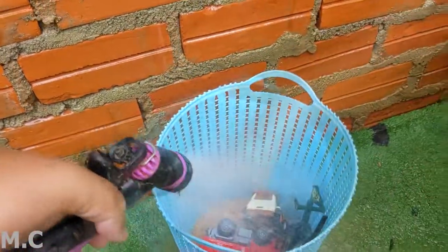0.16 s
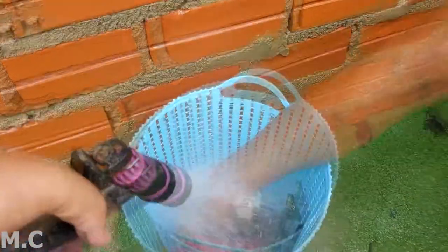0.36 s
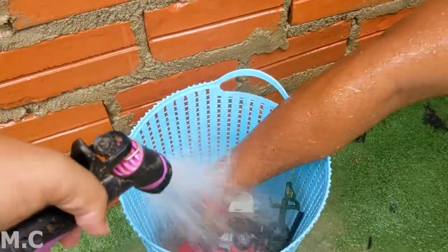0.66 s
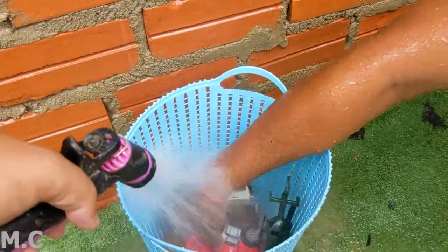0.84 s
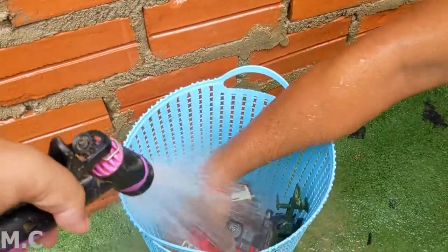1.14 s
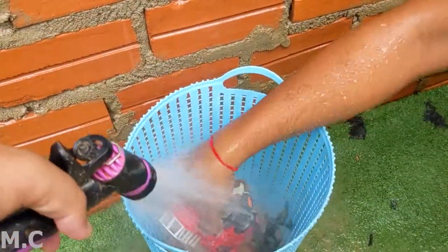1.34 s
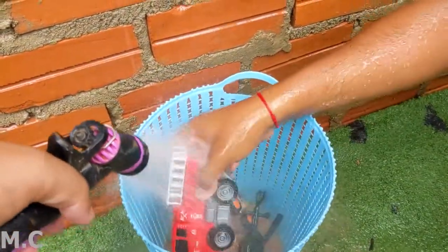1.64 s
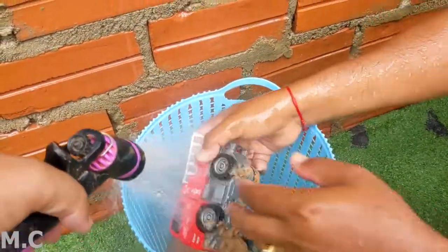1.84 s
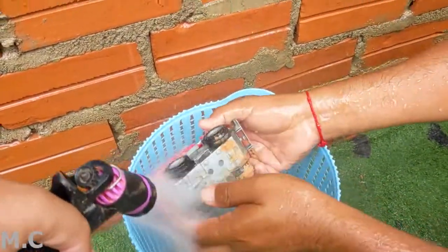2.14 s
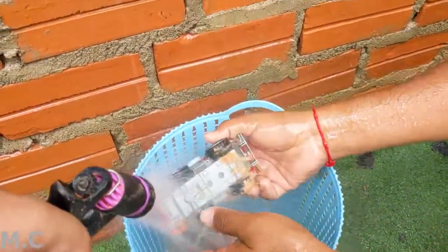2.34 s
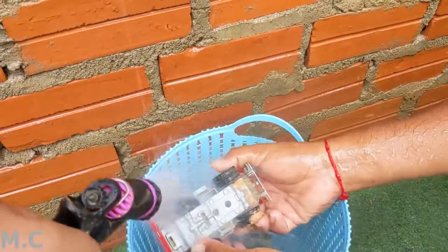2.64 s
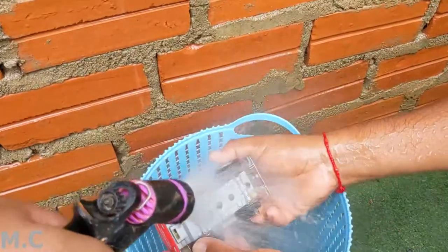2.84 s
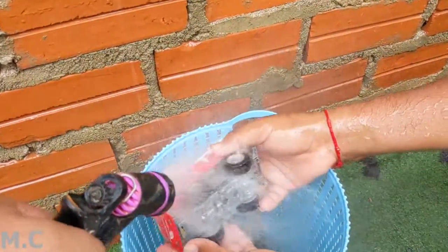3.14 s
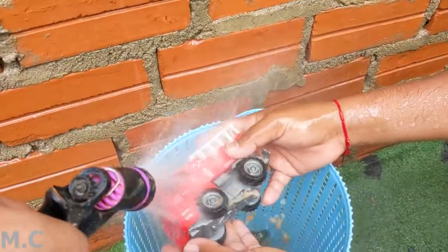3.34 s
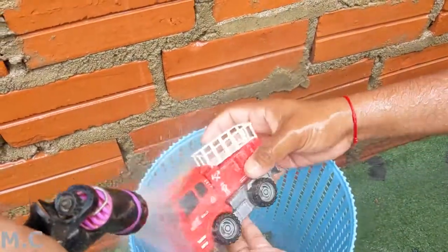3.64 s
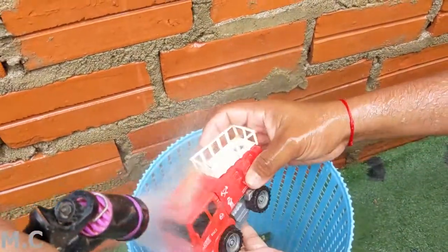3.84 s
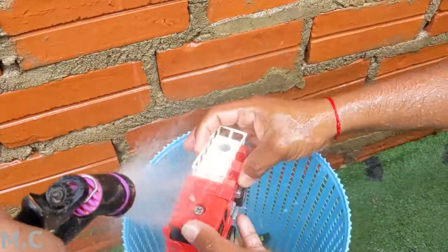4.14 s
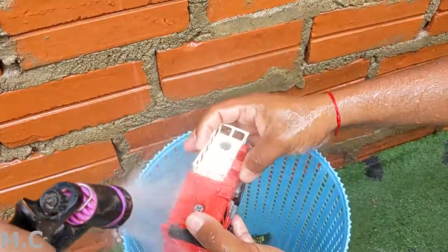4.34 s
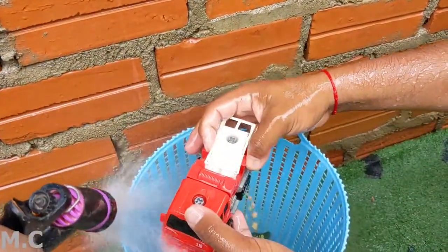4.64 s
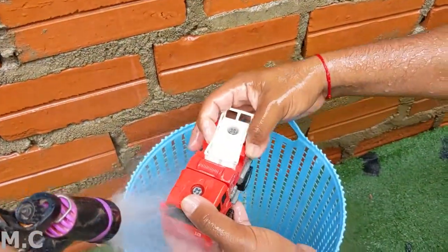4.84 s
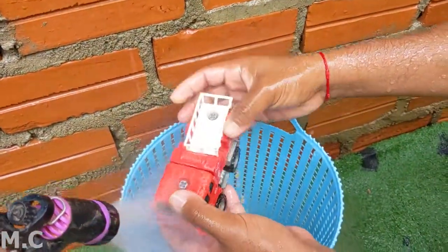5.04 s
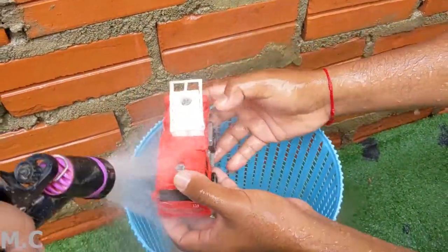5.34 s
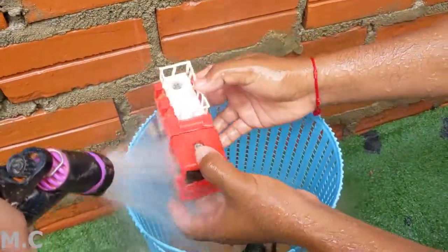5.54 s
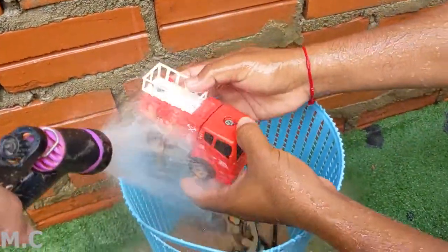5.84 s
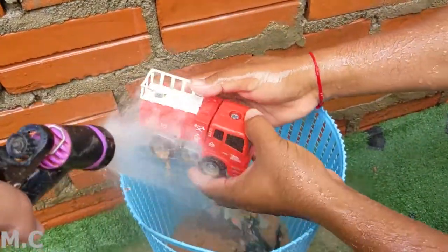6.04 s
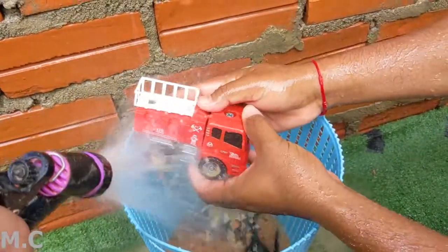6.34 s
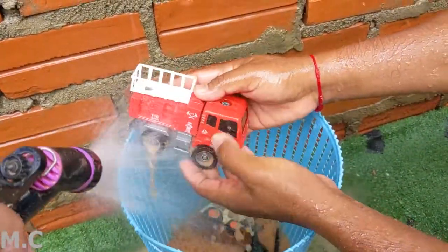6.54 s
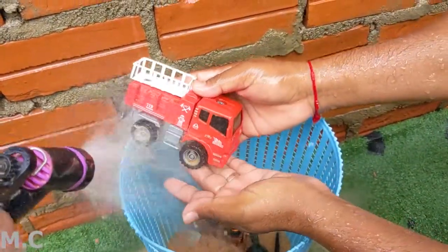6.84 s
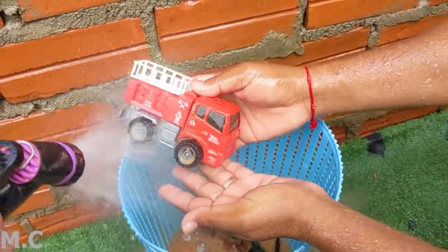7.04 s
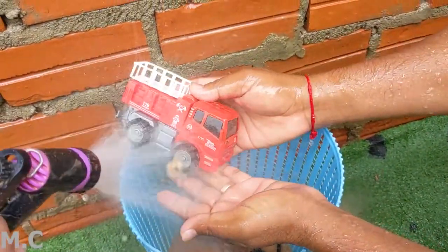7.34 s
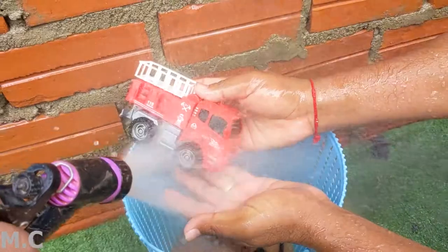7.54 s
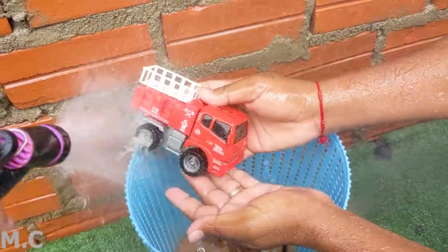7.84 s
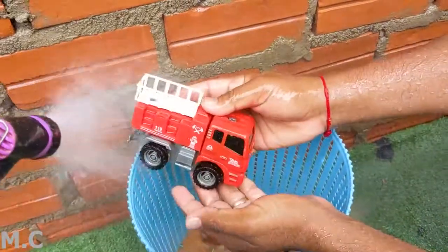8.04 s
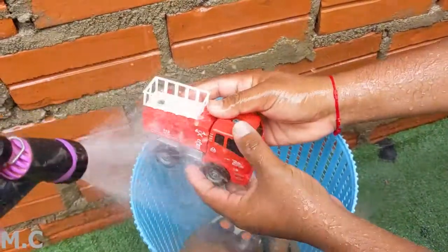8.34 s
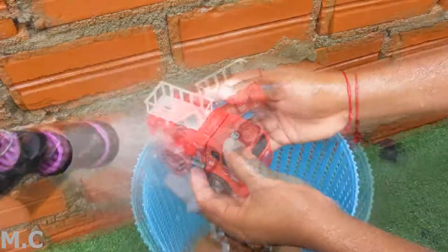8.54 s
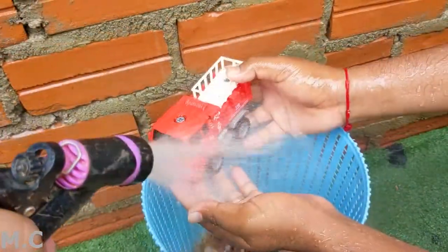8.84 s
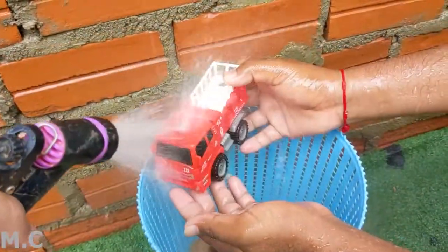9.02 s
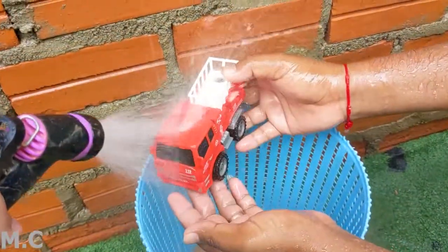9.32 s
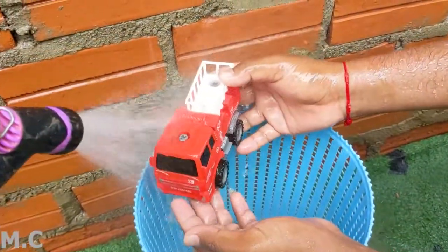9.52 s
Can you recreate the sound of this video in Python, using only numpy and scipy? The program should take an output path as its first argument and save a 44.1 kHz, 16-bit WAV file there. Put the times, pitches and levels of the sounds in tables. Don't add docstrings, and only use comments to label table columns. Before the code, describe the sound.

A hose nozzle hisses and sprays steadily onto a hollow plastic toy above a plastic basket, droplets pattering, hollow booms surging, a distant rooster at the end.

```python
import sys
import numpy as np
from scipy import signal
from scipy.fft import rfft, irfft, next_fast_len
from scipy.io import wavfile
from scipy.ndimage import uniform_filter1d, minimum_filter1d, map_coordinates

SR = 44100
rng = np.random.default_rng(int(sys.argv[2]) if len(sys.argv) > 2 else 0)


def digitize_waveform(pressure):
    field = np.atleast_2d(pressure).T
    bounded = np.clip(field, -1, 1)
    quanta = np.round(bounded * 32767).astype(np.int16)
    wavfile.write(sys.argv[1], SR, quanta)


def undo_db(level):
    steps = np.asarray(level, float) / 20
    return 10 ** steps


N = 426888
CONTROL_STEP = 64


def unit(x):
    return x / np.sqrt(np.mean(x ** 2) + 1e-20)


def along(points, hz):
    f, v = np.transpose(points)
    return np.interp(np.log(hz + 1), np.log(f + 1), v)


def curves(rows, t=None):
    s, *cols = np.transpose(rows)
    if t is None:
        t = np.arange(N) / SR
    return [np.interp(t, s, c) for c in cols]


def full(v):
    return np.interp(np.arange(N), np.arange(0, N, CONTROL_STEP), v)


def ramp(start_s, lasts_s):
    return np.clip((np.arange(N) / SR - start_s) / lasts_s, 0, 1)


def wobble(rate, count=N):
    knots = rng.standard_normal(int(count * rate / SR) + 4)
    return map_coordinates(knots, [np.arange(count) * rate / SR])


def filtered(x, response):
    m = next_fast_len(N + 8192)
    return irfft(rfft(x, m) * response(np.fft.rfftfreq(m, 1 / SR)), m)[..., :N]


def lifted(hz, bands):
    return sum(db * np.exp(-((hz - centre) / width) ** 2) for centre, width, db in bands)


def resonance(hz, centre_hz, width_hz):
    return (hz * width_hz) ** 2 / ((centre_hz ** 2 - hz ** 2) ** 2 + (hz * width_hz) ** 2)


def moving(centre_hz, width_hz, narrowing):
    def shape(hz, t):
        centre = np.interp(t * SR, np.arange(N), centre_hz)
        gain = resonance(hz, centre, width_hz * (centre.mean() / centre) ** narrowing)
        return gain / np.sqrt(np.mean(gain ** 2, axis=0))
    return shape


def patches(shape, bins, frames):
    field = uniform_filter1d(rng.standard_normal(shape), size=bins, axis=0)
    return unit(uniform_filter1d(field, size=frames, axis=1))


def drops(spiky_db, patchy_db, shape=None):
    hits = rng.standard_normal((2, N)) * undo_db(spiky_db * wobble(900))
    hz, t, z = signal.stft(hits, SR, nperseg=512)
    field = patches(z.shape[1:], 5, 10) + .9 * patches(z.shape[1:], 1, 60)
    z = z * undo_db(patchy_db * field)
    if shape is not None:
        z = z * shape(hz[:, None], t)
    return signal.istft(z, SR, nperseg=512)[1][:, :N]


# pitch_hz, likeness_0_to_1
PORT_LIKENESS = [(60, .97), (130, .84), (300, .95), (460, .6), (680, .96), (880, .7), (1150, .94),
                 (1600, .75), (2050, .15), (2650, .68), (3500, .38), (5500, .13), (6600, .28), (8000, .08),
                 (16000, .07)]


def heard(pair, gain):
    def mid_and_side(hz):
        turn = np.arccos(np.clip(along(PORT_LIKENESS, hz), 0, 1)) / 2
        return gain(hz) * [np.cos(turn), np.sin(turn)]
    mid, side = filtered(pair, mid_and_side)
    return unit(np.array([mid + side, mid - side]))


def bump(s, half_s, rise=1):
    edge_db, roundness = 9.5, 1.1
    t = (np.arange(0, N, CONTROL_STEP) / SR - s) / half_s
    return -edge_db * np.abs(np.where(t < 0, t / rise, t)) ** roundness


def passes(events, rises, rest_db, rest_hz):
    power = np.array([undo_db(2 * (db + bump(s, half_s, rise)))
                      for (s, db, half_s, _), rise in zip(events, rises)])
    rest = undo_db(2 * rest_db)
    total = full(power.sum(axis=0)) + rest
    pitch_hz = (full(np.transpose(events)[3] @ power) + rest * rest_hz) / total
    return 10 * np.log10(total), pitch_hz


# time_s, pitch_hz, fundamental_db, second_partial_db
ROOSTER_NOTES = [
    [(9.02, 840, -58, -44), (9.05, 908, -38, -29), (9.072, 958, -34, -34), (9.1, 937, -35, -35),
     (9.125, 924, -33, -31), (9.145, 912, -34, -32), (9.16, 887, -54, -31), (9.175, 845, -58, -46)],
    [(9.2, 830, -58, -46), (9.24, 905, -42, -38), (9.278, 937, -35, -35), (9.354, 932, -33, -40),
     (9.4, 928, -34, -32), (9.432, 934, -39, -38), (9.465, 890, -46, -35), (9.5, 862, -58, -42),
     (9.56, 860, -62, -52)],
]


def rooster():
    out = np.zeros(N)
    for note in ROOSTER_NOTES:
        start, stop = round(note[0][0] * SR), round(note[-1][0] * SR)
        hz, first_db, second_db = curves(note, np.arange(start, stop) / SR)
        shake = lambda rate: wobble(rate, count=stop - start)
        turn = 2 * np.pi * np.cumsum(hz * (1 + .007 * shake(70))) / SR
        upper = sum(undo_db(db + 2.2 * shake(90)) * np.sin(k * turn)
                    for k, db in enumerate([2, -12, -16, -15, -10], 2))
        first = undo_db(first_db - 2 + 2 * shake(60)) * np.sin(turn)
        out[start:stop] = 1.3 * (first + undo_db(second_db) * upper)
    return out


# time_s, flow_db, air_column_hz
RUNOFF = [(0, -0.5, 710), (1, -1, 670), (2.75, 0.5, 678), (3.35, 1.5, 546), (3.7, 1, 660), (4.6, 3, 626),
          (5, 4.5, 656), (5.3, 3.5, 640), (5.7, 2, 620), (6, 1.5, 640), (7.8, 0, 620), (8.5, 3.5, 636),
          (9.68, 0, 686)]
CHANGE_S, CHANGE_LASTS_S = 8.6, .03
# pitch_hz, density_db
RUMBLE_COLOUR = [(20, -32), (35, -31), (55, -2.5), (78, -5.5), (97, 3.5), (125, -11.5), (180, -4),
                 (400, -54)]


def ground():
    flow_db = curves(RUNOFF)[0]
    level_db = -52 + 0.73 * flow_db + 3 * ramp(CHANGE_S, CHANGE_LASTS_S)
    rumble = heard(rng.standard_normal((2, N)), lambda hz: undo_db(along(RUMBLE_COLOUR, hz)))
    gust_s, gust_db, gust_half_s, gust_top_hz = 5.16, -45, 0.078, 75
    low = unit(filtered(rumble, lambda hz: 1 / (1 + (hz / gust_top_hz) ** 8)))
    gust = full(undo_db(gust_db + bump(gust_s, gust_half_s))) * low
    return undo_db(level_db) * rumble + gust


RISE_SHARE = 0.67
# centre_s, level_db, half_length_s, pitch_hz
GUSHES = [(.1, -34, 0.064, 656), (1.25, -38, 0.1, 654), (1.91, -33, 0.075, 700), (4.99, -43, .1, 694),
          (5.63, -47, 0.088, 603), (5.82, -27, 0.045, 686), (8.23, -33, 0.033, 686),
          (8.65, -26.5, 0.078, 635), (8.87, -26.5, 0.086, 730), (9.06, -29, 0.14, 700),
          (9.3, -28.5, 0.14, 703), (9.68, -31, 0.14, 673)]
# pitch_hz, density_db
DRUM_COLOUR = [(71, -57), (120, -2), (156, 1), (301, 2.5), (449, -7.5), (520, -3.5), (680, -3.5),
               (1140, -36)]


def basket():
    flow_db, column_hz = curves(RUNOFF)
    ring_db, ring_hz = passes(GUSHES, [RISE_SHARE] * len(GUSHES), -44 + 2.15 * flow_db, column_hz)
    drum_db = -42 + 0.71 * flow_db - 7 * ramp(CHANGE_S, CHANGE_LASTS_S)
    air = lambda hz: resonance(hz, 600, 400) + .5 * resonance(hz, 677, 80)
    column = moving(ring_hz, width_hz=127, narrowing=0.91)
    ring = heard(drops(spiky_db=-1.0, patchy_db=1.3, shape=column), air)
    drum = heard(drops(spiky_db=0.1, patchy_db=1.86), lambda hz: undo_db(along(DRUM_COLOUR, hz)))
    gurgle_db = 1.7 * wobble(20) + 1.4 * wobble(7)
    return undo_db(ring_db - 2.2 + gurgle_db) * ring + undo_db(drum_db) * drum


# start_s, peak_db, pitch_hz
SLUGS = [(1.4062, -19, 1540), (3.558, -3.5, 1077), (3.641, -12, 1080), (3.726, -10, 1070),
         (3.786, -4, 1160), (3.888, -4, 1190), (4.1174, -14, 1260), (4.1939, -14, 1330), (4.338, -9, 1130),
         (4.6314, -20, 1250), (4.8904, -19, 1210), (4.9202, -28, 1270), (4.958, -4, 1330),
         (5.139, -20, 1280), (5.5428, -10, 1180), (5.736, -5, 1264), (5.8046, -30, 1190),
         (5.8557, -2, 1215), (5.96, -8, 1184), (5.9908, -3, 1214), (6.0526, -2.5, 1194),
         (6.2008, -11, 1174), (7.4673, -1, 1340), (7.496, -6, 1160), (7.659, -5, 1310), (7.715, -7, 1166),
         (8.17, -9, 1590), (8.6143, -13, 1230)]
# start_s, peak_db, pitch_hz, t60_s
KNOCKS = [
    (1.383, -22, 260, .045),
    (3.37, -21, 3200, .06),
    (3.395, -21, 2900, .05),
    (3.411, -13, 3100, .025),
    (3.435, -21, 2950, .07),
    (8.17, -20, 1560, .1),
    (8.37, -23, 2660, .08),
    (8.44, -20, 2680, .06),
]


def blows():
    out, t = np.zeros(N + SR), np.arange(SR // 8) / SR
    slaps = [(s, db - 9, hz, .04) for s, db, hz in SLUGS]
    for s, db, hz, t60 in slaps + KNOCKS:
        spread = 1 + .055 * rng.standard_normal(3)[:, None] * [[0], [1], [1]]
        modes = np.sin(2 * np.pi * hz * spread * t + rng.uniform(0, 1, (3, 1)))
        ring = modes.sum(axis=0) * .72
        soft_start = 1 - np.exp(-t / (.06 * t60))
        out[round(s * SR):][:len(t)] += undo_db(db - 60 * t / t60) * soft_start * ring
    return out[:N]


def whistles(songs, width_hz):
    level_db, centre_hz = passes(songs, [1] * len(songs), -70, 1300)
    turn = 2 * np.pi * np.cumsum(centre_hz) / SR
    tone = unit(.8 + wobble(width_hz)) * np.sin(turn) + 0.71 * wobble(width_hz) * np.cos(turn)
    return undo_db(level_db) * tone


# centre_s, level_db, half_length_s, pitch_hz
CAVITY_SONGS = [(.58, -33, .04, 1330), (2.17, -37, .04, 634), (2.57, -41, 0.0301, 668),
                (2.92, -39, .06, 664), (4.95, -26, 0.059, 1217), (5.12, -29, 0.073, 1208),
                (5.85, -25, .05, 1179), (6.3, -28.5, .05, 1390), (6.36, -30.5, .04, 1424),
                (6.415, -23, 0.032, 1403), (6.46, -29, 0.051, 1345), (6.51, -32, 0.038, 1400),
                (6.57, -29.5, 0.054, 1362), (7.88, -28.5, .05, 1660), (9.63, -35.5, .05, 3400)]
# centre_s, level_db, half_length_s, pitch_hz
RIM_SONGS = [(.1, -33, .06, 1604), (.3, -33.5, .05, 1650), (.6, -38, .04, 2600), (2.55, -35, .06, 1700),
             (2.75, -36, .06, 1720), (3.15, -35.5, .08, 1723), (3.3, -35, .06, 1700),
             (3.39, -29, .03, 3140), (3.43, -26, .035, 2950), (5.95, -30, .04, 2700),
             (6.28, -32, .04, 2685), (7.48, -26, .035, 1602), (7.52, -30, .03, 2680),
             (7.62, -29, .03, 2700), (7.69, -29, .03, 1600), (7.78, -30, .05, 2690), (8.2, -31, .04, 2650),
             (8.36, -31, .05, 2670), (8.45, -27, .03, 2680), (9.08, -33.5, .08, 2700),
             (9.26, -35, .05, 2750), (9.37, -35.5, .08, 5350)]


def cavities():
    return whistles(CAVITY_SONGS, width_hz=120) + whistles(RIM_SONGS, width_hz=250)


# time_s, level_db
AIM = [(0, -27), (.3, -29), (.5, -31), (1.3, -29.5), (1.75, -33.5), (2.25, -32), (2.5, -29), (2.97, -34),
       (3.4, -30), (4.3, -32.5), (4.7, -28), (5.2, -27.5), (5.45, -30), (6.1, -26.5), (7.3, -29.5),
       (7.85, -27.5), (8.6, -30.5), (9.68, -34)]


def aim():
    aim_db = curves(AIM)[0]
    return aim_db, aim_db - aim_db.mean()


# centre_s, swing_db, half_length_s, mist_share
FLICKS = [(.3, 0.5, 0.072, .5), (1.351, -7.5, 0.012, .1), (1.484, 3.5, 0.025, .8), (1.54, -1, .03, .7),
          (1.657, 3, 0.039, 0.61), (1.906, 6.5, 0.19, 0.46), (2.35, 1, 0.055, 1.5), (3.442, 2.5, 0.067, .1),
          (3.983, 1, 0.033, 2.4), (4.068, -1.5, .03, 2), (4.132, 1.5, 0.061, 2.1), (4.29, -0.5, 0.045, 2.7),
          (4.35, 0.5, .04, 3), (4.45, -0.5, 0.065, 1), (6.106, 1.5, 0.057, 0.92), (6.28, 2.5, 0.028, .2),
          (6.349, -4, .03, .3), (7.477, 3.5, 0.092, 0.39), (7.988, -9.5, .04, 0.36),
          (8.045, -12, .045, 0.32), (8.1, -11, 0.041, 0.33), (8.195, 0.5, 0.035, .9),
          (8.291, -3.5, 0.048, .3), (8.432, 4.5, 0.065, .1), (8.745, -4, 0.026, 0.31),
          (8.853, 1.5, .04, .5), (8.925, -1.5, 0.05, 2.2), (9.07, 3, 0.1, .3), (9.384, 0.5, 0.042, 5.5),
          (9.566, -1, 0.092, 4.4), (9.67, 3, 0.017, 2.5)]


def wrist():
    edge_db = 9.5
    shapes = np.array([undo_db(-bump(s, half_s) ** 2 / edge_db) for s, _, half_s, _ in FLICKS])
    _, db, _, share = np.transpose(FLICKS)
    return full(db @ shapes), full(db * share @ shapes)


# centre_s, level_db, half_length_s, resonance_hz
SWEEPS = [(.08, -27.5, 0.18, 1270), (.23, -25, 0.045, 1510), (.58, -25.5, 0.035, 1430),
          (.95, -29, 0.084, 1230), (1.91, -25.5, 0.15, 1390), (2.56, -27, 0.064, 1480),
          (3.51, -18, 0.089, 1090), (3.62, -21.5, 0.098, 1110), (3.88, -19, 0.056, 1120),
          (3.99, -20, 0.041, 1160), (4.12, -19.5, 0.044, 1130), (4.2, -21.5, 0.036, 1380),
          (4.35, -25, 0.11, 1140), (4.63, -25, 0.14, 1220), (4.93, -19, 0.081, 1280),
          (5.14, -22, 0.1, 1300), (5.34, -25, 0.098, 1230), (5.56, -22, 0.072, 1160),
          (5.75, -20.5, 0.047, 1250), (6.23, -26, 0.093, 1280), (6.34, -26, 0.093, 1470),
          (6.42, -31, 0.059, 1400), (6.53, -35, .1, 1400), (7.49, -17, 0.065, 1270),
          (7.62, -21.5, 0.2, 1254), (7.9, -23, 0.033, 1650), (8.19, -19.5, 0.049, 1488),
          (8.63, -18.5, 0.073, 1260), (8.84, -25.5, 0.14, 1340), (9.01, -21, 0.051, 1262),
          (9.2, -26, 0.49, 1310)]
# centre_s, level_db, fall_half_length_s, resonance_hz
SLIPS = [
    (5.86, -16, 0.038, 1260),
    (6.05, -19, 0.037, 1270),
    (7.81, -20, 0.055, 1220),
    (8.45, -24.5, 0.039, 1520),
]
# pitch_hz, width_hz, lift_db
PANELS = [(1120, 50, 2), (1205, 45, 5), (1345, 60, 6), (1490, 50, -3), (1610, 70, 2)]


def hollow(flutter, flick_db):
    slip_rise = 3.73
    stray_db = -40.5 + 0.33 * aim()[1] + 1.7 * flick_db + 3.06 * wobble(6.9)
    rises = [RISE_SHARE] * len(SWEEPS) + [slip_rise] * len(SLIPS)
    level_db, centre_hz = passes(SWEEPS + SLIPS, rises, stray_db, rest_hz=1390)
    walls = lambda hz: undo_db(lifted(hz, PANELS)) / (1 + (1030 / (hz + 1)) ** 22)
    cavity = moving(centre_hz, width_hz=470, narrowing=3.0)
    boom = heard(drops(spiky_db=2.0, patchy_db=1.5, shape=cavity), walls)
    gurgle_db = 0.98 * wobble(40) + 0.15 * flutter
    return undo_db(level_db - 3.0 + gurgle_db) * boom


# pitch_hz, density_db
PATTER_COLOUR = [(300, -26), (700, -4.5), (950, -7.5), (1600, 1.5), (2050, -2), (2650, -1), (3300, 0),
                 (4400, -4), (5500, -8.5), (9000, -21), (16000, -13.5)]
# pitch_hz, width_hz, lift_db
BARE_BANDS = [
    (980, 130, -4),
    (1960, 90, -1.5),
    (2700, 170, 1.5),
]
# pitch_hz, width_hz, lift_db
SHELL_BANDS = [
    (1700, 80, 3),
    (2060, 110, -6),
    (2380, 70, 3),
    (2670, 90, 6),
    (3500, 120, 3),
]


def patter(flutter, flick_db):
    coarse = drops(spiky_db=2.0, patchy_db=1.56)
    bare, toy = [heard(coarse, lambda hz: undo_db(along(PATTER_COLOUR, hz) + lifted(hz, target)))
                 for target in (BARE_BANDS, SHELL_BANDS)]
    held = ramp(2.4, 1.43)
    level_db = aim()[0] + flick_db + 2.0 + 0.13 * flutter + 0.81 * wobble(25)
    return undo_db(level_db) * ((1 - held) * bare + held * toy)


# time_s, level_db
NEAR = [(0, -1.5), (1, -1), (1.8, 0.5), (3, -.5), (4.4, -1), (6.3, 0.5), (8.5, 1), (8.7, -3.5),
        (9.68, -0.5)]
# pitch_hz, density_db
MIST_COLOUR = [(1500, -20.5), (3500, -4), (5000, -1.5), (7000, -4), (9000, 2), (10500, -2.5), (13000, -19),
               (16000, -35)]


def mist(flutter, puff_db):
    level_db = -26 + 0.25 * aim()[1] + puff_db + curves(NEAR)[0]
    fine = heard(drops(spiky_db=1.0, patchy_db=1.35), lambda hz: undo_db(along(MIST_COLOUR, hz)))
    return undo_db(level_db + 0.55 * flutter + 0.36 * wobble(25)) * fine


# pitch_hz, density_db
HISS_COLOUR = [(3000, -42), (7000, -6.5), (9500, -4.5), (11000, 5), (12500, 3), (13800, -8.5),
               (15000, -2.5), (16000, -12)]


def nozzle(flutter, puff_db):
    level_db = -25 + 0.11 * aim()[1] + 0.38 * puff_db + 0.35 * curves(NEAR)[0]
    hiss = heard(drops(spiky_db=1.6, patchy_db=1.2), lambda hz: undo_db(along(HISS_COLOUR, hz)))
    return undo_db(level_db + 0.14 * flutter + 0.4 * wobble(30)) * hiss


def scene():
    flutter = unit(0.2 * wobble(4.5) + 0.6 * wobble(14) + 1.6 * wobble(70))
    flick_db, puff_db = wrist()
    background = rooster() + ground() + basket()
    toy = blows() + cavities() + hollow(flutter, flick_db)
    spray = patter(flutter, flick_db) + mist(flutter, puff_db) + nozzle(flutter, puff_db)
    return background + toy + spray


def starved(x, under_db, masked):
    hz, _, z = signal.stft(x, SR, nperseg=2048)
    band = uniform_filter1d(np.abs(z) ** 2, size=7, axis=1)
    usual = uniform_filter1d(uniform_filter1d(band, size=40, axis=1), size=3, axis=2) + 1e-20
    limit = usual * undo_db(2 * under_db) * (usual.max(axis=0) / usual) ** masked
    lost = -minimum_filter1d(-1. * (band < limit), size=7, axis=1)
    lost = lost * (hz[:, None] > 3300)
    return signal.istft(z * (1 - .97 * lost), SR, nperseg=2048)[1][:, :N]


def band_limit(x):
    return signal.sosfilt(signal.butter(12, 16990, fs=SR, output="sos"), x)


# pitch_hz, level_db
RIGHT_PORT = [(60, -1.5), (800, -0.5), (1200, 4), (1600, -4.5), (2100, 4), (2700, 2), (3700, 5), (4600, 0),
              (6300, -4), (7500, -7), (10000, -16), (11200, -6), (12200, -2), (13600, 4.5), (15300, -5)]
# pitch_hz, width_hz, lift_db
REFLECTIONS = [
    [(4490, 44, 8), (5310, 180, 3), (6110, 150, 5), (6830, 190, 6.5), (8900, 250, 0), (11700, 67, 6.5),
     (13000, 96, 10), (14600, 150, 6.5), (15400, 250, 7)],
    [(4233, 85, 4), (6400, 190, 7), (12270, 140, 3), (12700, 150, -6), (13550, 200, 6.5), (14500, 250, 6),
     (15550, 250, 6), (6700, 150, -7)],
]


def record(dry):
    lag_s, top_hz = 0.00014, 15750

    def ports(hz):
        lifts = [lifted(hz, side) for side in REFLECTIONS]
        turn = np.pi * hz * lag_s / (1 + (750 / (hz + 1)) ** 4) - lifted(hz, [(2600, 800, .55)])
        late = np.exp(1j * turn * np.array([[1], [-1]]))
        colour = undo_db(lifts + along(RIGHT_PORT, hz) * np.array([[0], [1]]))
        return colour * late * (hz < top_hz)
    mix = starved(filtered(dry, ports), under_db=-7.5, masked=.55)
    return band_limit(mix)


dry = scene()
out = record(dry)
digitize_waveform(out)
```